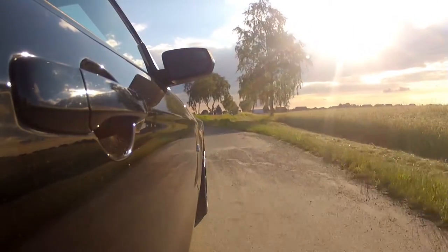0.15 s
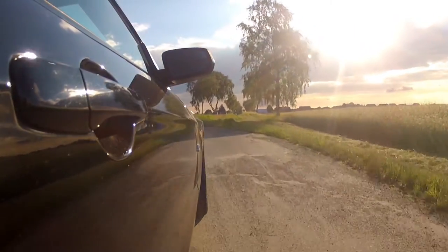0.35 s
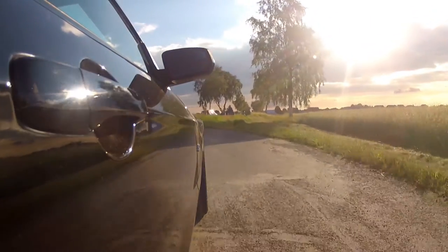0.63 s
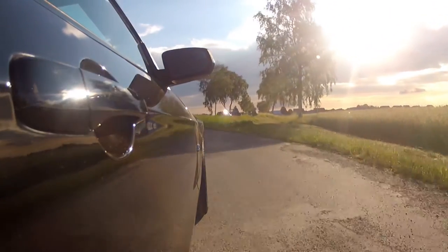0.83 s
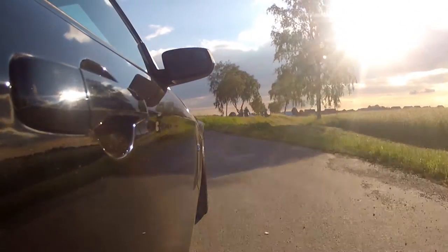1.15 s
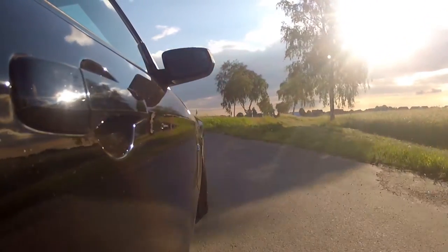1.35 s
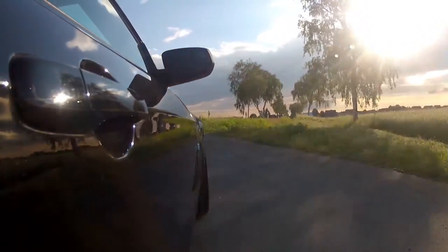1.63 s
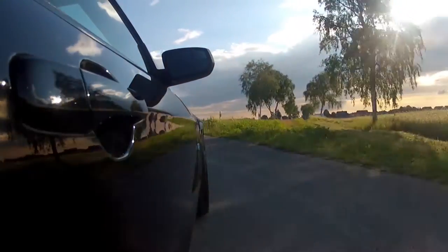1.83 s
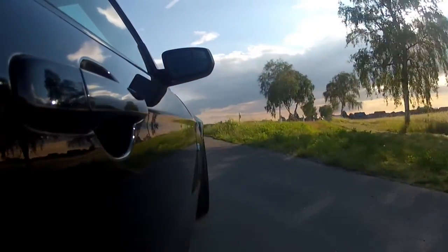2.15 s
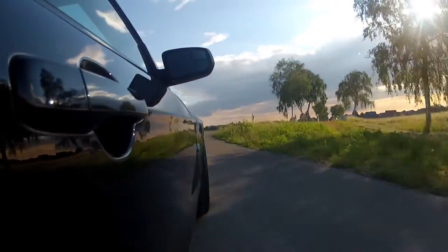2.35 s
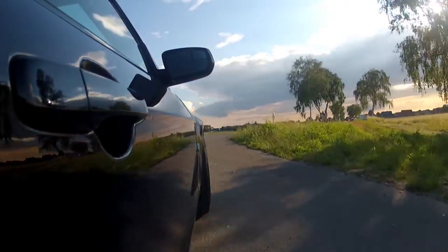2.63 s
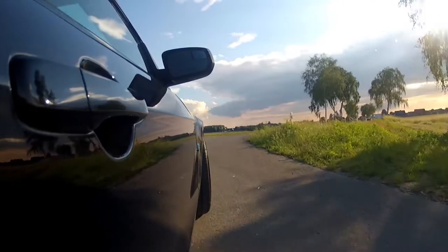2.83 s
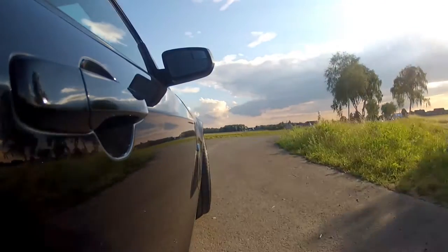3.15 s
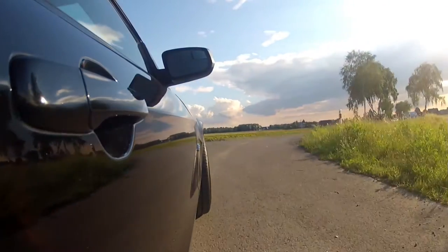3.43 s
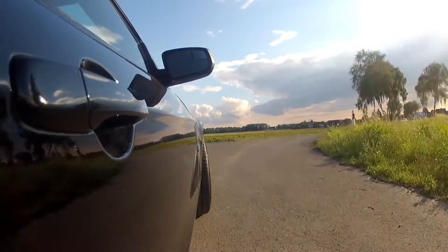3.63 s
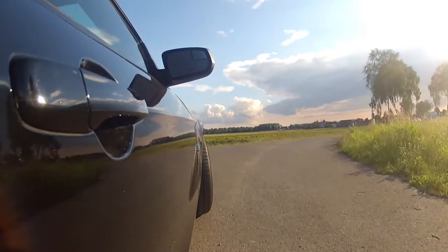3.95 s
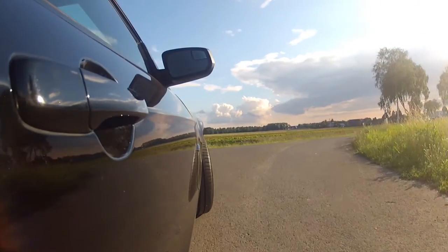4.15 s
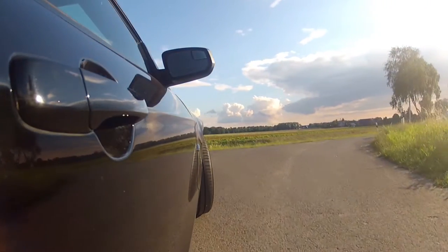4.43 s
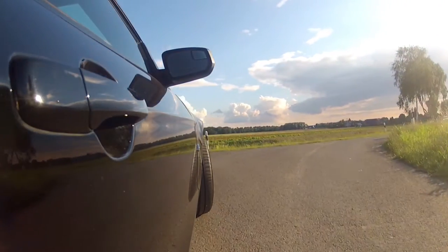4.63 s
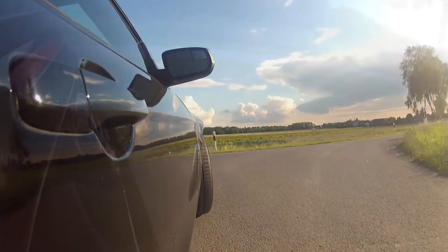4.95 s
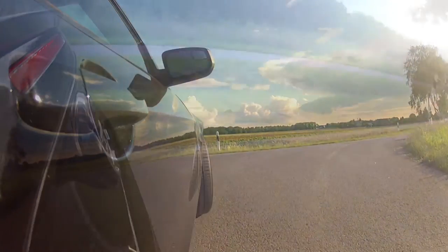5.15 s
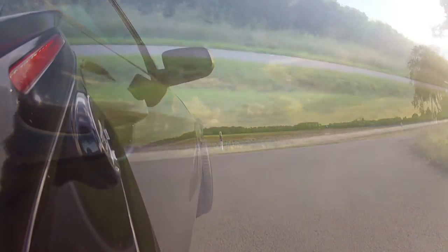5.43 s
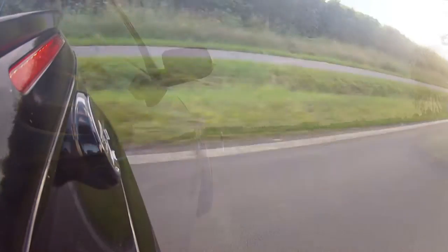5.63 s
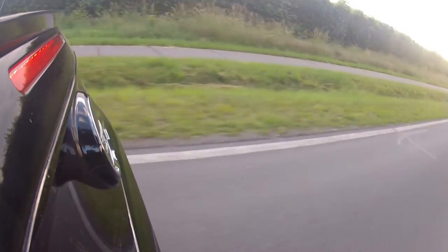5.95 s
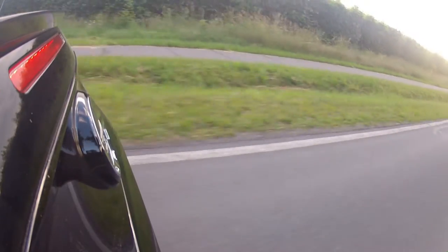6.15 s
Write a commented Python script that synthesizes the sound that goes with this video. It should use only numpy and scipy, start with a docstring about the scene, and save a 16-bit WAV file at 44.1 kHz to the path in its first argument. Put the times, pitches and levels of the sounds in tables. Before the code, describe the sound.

A V8 sports car pulls away on a country lane, heard close from its flank. The loud exhaust throbs at steady revs, then sinks to a loose, quiet burble. The tyres crunch over grit and fling stones against the body, with a few dull thuds from underneath. Near the end the sound changes to the car cruising and shifting up with a low boom, light ticking and wind buffeting the microphone.

```python
"""A country lane, heard from the flank of a V8 sports car as it pulls away. Eight unequal firings excite
the exhaust pipe's resonances, so the sound throbs once per engine cycle; then the revs sink to a burble
while the tyres crunch over grit and fling stones at the body. After five seconds the scene dissolves to
the car cruising and shifting up, with light ticking at the tail and turbulence buffeting the microphone."""
import sys
import numpy as np
from scipy import signal
from scipy.fft import rfft, irfft, next_fast_len
from scipy.io import wavfile
from scipy.ndimage import uniform_filter1d, map_coordinates

SR = 44100
rng = np.random.default_rng(int(sys.argv[2]) if len(sys.argv) > 2 else 0)


def generate_wav(signal):
    """Clip the signal to [-1, 1] and save it as 16-bit WAV at the path in sys.argv[1]."""
    frames = np.transpose(np.atleast_2d(signal))
    scaled = np.clip(frames, -1, 1) * 32767
    pcm = np.round(scaled).astype(np.int16)
    wavfile.write(sys.argv[1], SR, pcm)


N = 277377
T = np.arange(N) / SR


def amp(db):
    """Amplitude ratio of a level in decibels."""
    return 10 ** (np.asarray(db) / 20)


def unit(x):
    """Normalisation to rms 1."""
    return x / np.sqrt(np.mean(x ** 2) + 1e-20)


def steady(x):
    """Normalisation to about rms 1 over a sliding quarter second."""
    power = uniform_filter1d(uniform_filter1d(x ** 2, size=SR // 4), size=SR // 8)
    return x / np.sqrt(np.abs(power) + 1e-3 * np.mean(x ** 2))


def curves(rows):
    """Linear interpolation in time of each column after t/s."""
    s, *columns = np.transpose(rows)
    return [np.interp(T, s, column) for column in columns]


def ramp(start_s, length_s):
    """Linear rise from 0 to 1."""
    return np.clip((T - start_s) / length_s, 0, 1)


def swells(rows):
    """Gaussian rises or dips of level, from rows of t/s, half length/s, level/dB."""
    return sum(db * np.exp(-((T - s) / half_s) ** 2) for s, half_s, db in rows)


def wobble(rate):
    """Smooth random modulation with `rate` knots a second."""
    return map_coordinates(rng.standard_normal(int(N * rate / SR) + 4), [T * rate])


def shape(points, hz):
    """Gain interpolated on a log-frequency axis from points of f/Hz, level/dB."""
    f, db = np.transpose(points)
    return amp(np.interp(np.log(hz + 1), np.log(f), db))


def filtered(x, response):
    """Linear filtering: the spectrum times a complex frequency response."""
    m = next_fast_len(N + SR // 2)
    return irfft(rfft(x, m) * response(np.fft.rfftfreq(m, 1 / SR)), m)[:N]


def noise(points):
    """Gaussian noise of rms 1, coloured by points of f/Hz, relative level/dB."""
    return unit(filtered(rng.standard_normal(N), lambda hz: shape(points, hz)))


def resonance(hz, centre, width):
    """Response of a damped oscillator, with a peak gain of 1."""
    return 1j * hz * width / (centre ** 2 - hz ** 2 + 1j * hz * width)


def coasting(firing_hz, from_hz=76, over_hz=9):
    """Change of regime: 0 for the hard beat under load, 1 for the loose burble at low revs."""
    return np.clip((from_hz - firing_hz) / over_hz, 0, 1)


def firings(firing_hz):
    """Periodic modulation: unequal cylinders repeat their pattern every eight firings, hence the throb."""
    # per cylinder, relative: chuff level/dB, loaded bark level/dB, coasting bark level/dB, manifold delay/s
    cylinders = np.array([(-16.5, 0.5, 4.5, 0.00084), (8, -8, -11.5, 0.00287), (8.5, -14, -5, 0.00044),
                          (12, -14.5, -6.5, 0.003624), (5, -11.5, -1.5, 0.005555), (10, -15, -6.5, .006),
                          (8.5, -19, -5, 0.0019), (8.5, -6.5, -10.5, 0.00026)])
    phase = np.cumsum(firing_hz) / SR - 1.65  # counted in firings
    fired = np.flatnonzero(np.diff(np.floor(phase)) > 0)
    cylinder = np.floor(phase[fired + 1]).astype(int) % len(cylinders)
    chuffs_db, loaded_db, coasting_db, manifold_s = cylinders[cylinder].T
    coast = coasting(firing_hz[fired])
    barks_db = loaded_db + coast * (coasting_db - loaded_db)
    jitter, chuff_scatter, bark_scatter = rng.standard_normal((3, len(fired)), ).reshape(-1, 3).T
    delay_s = manifold_s + (.00015 + .0005 * coast) * jitter
    spread_db = 2.1 + 0.15 * coast
    exits = np.clip(fired + (delay_s * SR).astype(int), 0, N - 1)
    return phase, exits, chuffs_db + spread_db * chuff_scatter, barks_db + spread_db * bark_scatter


def pipe(hz, direct=0.49, lag_s=0.00991, lag_hz=520):
    """Standing waves add to the direct sound; dispersion delays the highs, so each pulse chirps upwards."""
    # exhaust pipe modes: f/Hz, bandwidth/Hz, level/dB
    modes = [(73.8, 65, 2), (160.3, 27.4, -3.5), (193.5, 21, -2.5), (284, 45, 3), (370.7, 109, -1.5),
             (475.8, 27, 1), (495, 13, -19)]
    ring = sum(amp(db) * resonance(hz, centre, width) for centre, width, db in modes)
    group_delay_s = lag_s * np.minimum(hz / lag_hz, 1.15) ** 4
    return (direct + ring) * np.exp(-2j * np.pi * np.cumsum(group_delay_s) * hz[1])


def gas_pulses(exits, sizes_db, spectrum, roughness, puff_s=0.035):
    """Source and filter: slugs of gas, each trailing a puff of turbulence, excite the pipe."""
    pulses = np.bincount(exits, amp(sizes_db), N)
    puff_envelope = signal.lfilter([1], [1, -np.exp(-1 / (puff_s * SR))], pulses)
    flow = unit(pulses) + roughness * unit(puff_envelope * rng.standard_normal(N))
    return steady(filtered(flow, lambda hz: shape(spectrum, hz) * pipe(hz)))


def exhaust(firing_hz, boom_db, chuff_db, bark_db, chuff_rough, bark_rough):
    """Forced vibration: soft chuffs, hard barks, and the silencer's boom at the firing rate and octave."""
    # soft and hard firings behind the silencer: f/Hz, relative level/dB
    chuff_spectrum = [(30, -37.5), (60, -12.5), (110, -1.5), (160, -0.5), (240, 2.5), (330, -16),
                      (500, -24.5), (700, -21), (1200, -70.5), (3000, -100)]
    bark_spectrum = [(25, -30), (50, 1), (72, 0), (130, -15), (220, -11.5), (310, 6.5), (400, 0.5),
                     (520, -3.5), (620, -13.5), (750, -36.5), (1100, -47), (2500, -68), (4000, -100)]
    # low resonances of the silencer: f/Hz, gain/dB
    boom_response = [(42, -19), (49, -21.5), (55, -4), (62, -1), (74, -3), (83, 2), (90, -4), (97, -13),
                     (108, -20), (130, -28), (190, -16.5)]
    phase, exits, chuffs_db, barks_db = firings(firing_hz)
    chuff = amp(chuff_db) * gas_pulses(exits, chuffs_db, chuff_spectrum, chuff_rough)
    bark = amp(bark_db) * gas_pulses(exits, barks_db, bark_spectrum, bark_rough)
    boom = sum(shape(boom_response, k * firing_hz) * np.sin(2 * np.pi * k * phase) for k in (1, 2))
    return chuff + bark + amp(boom_db + 0.45 * wobble(12)) * boom


def pull_away(idle_hz=38.4, sink_s=1.19):
    """Exponential decay: revs are held, then sink towards idle; the exhaust grows with revs and load."""
    # firing rate while the clutch takes up: t/s, f/Hz
    held_revs = [(0, 92), (.3, 96.7), (.6, 96), (.9, 97), (1.2, 94), (1.49, 93.7)]
    # throttle jabs and lifts, heard in the bark: t/s, half length/s, level change/dB
    jabs = [(.655, 0.073, 3), (1.2, 0.11, 1.5), (1.46, 0.1, -5), (1.63, .04, 3.5), (1.9, .08, 4)]
    held_hz, = curves(held_revs)
    lift_s, full_hz = held_revs[-1]
    firing_hz = idle_hz + (held_hz - idle_hz) * np.exp(-np.maximum(T - lift_s, 0) / sink_s)
    revs = (firing_hz - firing_hz.min()) / (full_hz - firing_hz.min())
    load = 1 - ramp(start_s=0.29, length_s=0.71)  # the effort of getting the car rolling
    boom_db = -20 + 5.35 * revs + 16.5 * load
    chuff_db = -32 + 13.3 * revs + 5.74 * load
    bark_db = -37 + 21.28 * revs + 1.44 * load + swells(jabs)
    coast = coasting(firing_hz)
    return exhaust(firing_hz, boom_db, chuff_db, bark_db,
                   chuff_rough=0.5 + 1.2 * coast, bark_rough=0.24 + 0.76 * coast)


def engine_bay():
    """Band-limited noise: a faint, narrow hiss from the engine bay."""
    # hiss: f/Hz, relative level/dB
    hiss_spectrum = [(1200, -25), (1600, 1), (1820, -2.5), (2100, 1), (2800, -21.5), (4000, -26.5)]
    return amp(-58) * noise(hiss_spectrum)


def tyres(grains_per_s=1500):
    """Rolling noise: the tread roars, the road drums through the body and grit cracks under the rubber."""
    # base level of the rolling noise: t/s, level/dB
    rolling = [(0.0, -46.5), (0.68, -44.5), (1.07, -40.5), (1.37, -43), (3.68, -56.5), (4.01, -59),
               (4.97, -56.5), (5.78, -46.5), (6.29, -50)]
    # patches of loose gravel: t/s, half length/s, extra crunch level/dB
    gravel = [(0.267, 0.24, 6), (0.877, .07, 7), (1.16, .12, 8.5)]
    # grit, tread and body: f/Hz, relative level/dB
    crunch_spectrum = [(700, -7.5), (1600, -14), (2200, 6), (2900, 5.5), (3600, -2), (4300, -8),
                       (5500, -15.5)]
    roar_spectrum = [(200, -16.5), (500, 9.5), (750, 0), (1150, -5), (1700, -11), (2600, -12), (3600, -20),
                     (5500, -33)]
    drumming_spectrum = [(12, -17.5), (30, -19.5), (60, 5), (90, -2.5), (160, -11.5), (400, -28),
                         (2000, -91)]
    level_db, = curves(rolling)
    asphalt = ramp(start_s=4.46, length_s=.7)
    crunch_db = level_db + swells(gravel) - 0.5 - 9.5 * asphalt
    grains = (rng.random(N) < grains_per_s / SR) * rng.standard_normal(N)
    grains *= amp(3.3 * np.minimum(rng.exponential(size=N), 4))  # a few crack much louder
    cracking = unit(grains) + 1.03 * rng.standard_normal(N)
    grit = unit(filtered(cracking, lambda hz: shape(crunch_spectrum, hz)))
    roar = amp(level_db + 9 + wobble(26)) * noise(roar_spectrum)
    drumming = amp(level_db + 19.5 + 2.6 * wobble(6.5)) * noise(drumming_spectrum)
    return roar + drumming + amp(crunch_db + 1.9 * wobble(25)) * grit


def knock(s, db, centre_hz, t60, width_hz, snap=3):
    """Impact excitation: an impulse and a decaying noise burst drive one broad resonance."""
    t = np.arange(SR // 5) / SR
    burst = rng.standard_normal(len(t)) * amp(-60 * t / t60) + snap * (t == 0)
    response = resonance(np.fft.rfftfreq(len(t), 1 / SR), centre_hz, width_hz) ** 2
    ring = irfft(rfft(burst) * response, len(t))
    return np.pad(amp(db) * ring / np.abs(ring).max(), (round(s * SR), N))[:N]


def stones(chips_from_s=2.0, chips_for_s=1.4):
    """Brief impacts: flung stones snap against the body, with small chips at random as the car coasts."""
    # the loudest stones: t/s, peak level/dB, f/Hz, T60/s
    strikes = [(.193, -24, 2310, .015), (.893, -22, 2300, 0.025), (1.409, -19.5, 3020, .009),
               (1.51, -27, 2730, 0.036), (1.556, -19, 4640, .008), (1.88, -34, 3760, .085),
               (2.599, -31.5, 2940, .013), (2.68, -30.5, 2940, .012), (3.017, -32.5, 2600, .018),
               (3.148, -35, 2750, 0.036), (3.989, -34, 2710, 0.013), (4.326, -23, 3100, .006)]
    big = sum(knock(s, db, hz, t60, width_hz=0.45 * hz) for s, db, hz, t60 in strikes)
    chips = sum(knock(chips_from_s + when * chips_for_s, db=-39 + 5 * strength,
                      centre_hz=2850, t60=0.015, width_hz=1200)
                for when, strength in rng.random(size=(8, 2)))
    return big + chips


def thuds():
    """Damped low resonances: dull thuds from under the car, and at 3.2 and 3.7 s two hard exhaust firings
    ringing near 280 Hz."""
    # thuds and hard firings: t/s, peak level/dB, f/Hz, T60/s
    blows = [(.548, -5, 74.4, 0.092), (1.968, -9.5, 180, 0.15), (3.175, -18, 280, .18),
             (3.665, -24.5, 282, 0.21), (5.195, -22.5, 560, 0.085), (5.59, -12.5, 112, .05)]
    return sum(knock(s, db, hz, t60, width_hz=.31 * hz) for s, db, hz, t60 in blows)


def wheel_arch(hit_s=3.4255, bounce_s=.003):
    """Modal ringing: one big stone hits the wheel arch and bounces once."""
    # modes of the arch: f/Hz, relative level/dB, T60/s
    modes = [(1150, -3, .022), (1670, -7, .012), (2300, -2.5, 0.021), (3100, -1.5, .04)]
    return sum(knock(s, contact_db + mode_db, hz, t60, width_hz=0.34 * hz, snap=6)
               for s, contact_db in ((hit_s, -23), (hit_s + bounce_s, -28)) for hz, mode_db, t60 in modes)


def scrape(at_s=4.115, half_s=.03):
    """Treble noise under a Gaussian envelope: one faint, high scrape."""
    # scrape: f/Hz, relative level/dB
    spectrum = [(1000, -90), (2500, -43), (3800, 2.5), (4300, -3.5), (5000, -5.0), (5600, -24)]
    stroke = np.exp(-((T - at_s) / half_s) ** 2)
    return amp(-55.5) * stroke * noise(spectrum)


def wind():
    """Turbulent pressure: at speed the air tumbles over the microphone, at times in a heavy gust."""
    # deep buffeting and broader rush: f/Hz, relative level/dB
    buffet_spectrum = [(10, -16), (24, -3), (50, -6), (75, -1.5), (110, -10), (200, -21.5), (800, -100)]
    rush_spectrum = [(40, -9.5), (110, 4.5), (200, -2), (320, -4.5), (450, -10), (620, -13), (900, -44.5),
                     (2000, -35.5), (4000, -90.5)]
    # single gusts: t/s, peak level/dB, f/Hz
    gust_peaks = [(5.145, -14.5, 80), (5.31, -10.5, 89), (5.405, -10.5, 67.5), (5.645, -10.5, 56.29)]
    buffet = amp(-20.5 + 1.2 * wobble(21)) * noise(buffet_spectrum)
    rush = amp(-24.5 + 3.8 * wobble(40)) * noise(rush_spectrum)
    gusts = sum(knock(s, db, hz, t60=0.14, width_hz=0.24 * hz) for s, db, hz in gust_peaks)
    return (buffet + rush) * ramp(start_s=4.81, length_s=0.44) + gusts


def cruise():
    """Resonance at even load: a shift up lowers the firing rate, and the silencer's boom swells."""
    # cruising: t/s, firing rate f/Hz, boom drive level/dB
    upshift = [(5.1, 82, -26), (5.55, 83, -28), (5.72, 70.3, -12), (5.95, 70, -13.5), (6.29, 62, -13)]
    firing_hz, boom_db = curves(upshift)
    return exhaust(firing_hz, boom_db, chuff_db=-27, bark_db=-32, chuff_rough=0.34, bark_rough=0.4)


def ticking(period_s=.0342):
    """Periodic impulses on a high resonance: runs of light ticking at the tail."""
    # runs: start t/s, length/s, mean peak level/dB
    runs = [(5.289, .085, -45.5), (5.43, .02, -47), (5.7734, .04, -36.5), (5.845, .28, -40.5),
            (6.2104, .02, -42)]
    return sum(knock(s, db + 1.2 * rng.standard_normal(), centre_hz=4100, t60=0.023, width_hz=2000)
               for start, length, db in runs for s in np.arange(start, start + length, period_s))


def scene():
    """Superposition in the open air at one close microphone; the pull-away dissolves into the cruise."""
    dissolve = ramp(start_s=5.03, length_s=.15)
    engine = dissolve * cruise() + (1 - dissolve) * (pull_away() + engine_bay())
    return (engine + tyres() + stones() + wheel_arch() + thuds() + ticking() + scrape() + wind())[None]


def record(dry, ceiling=.96, hold_hz=12000, top_hz=15150):
    """Clipping flattens the loudest throbs; sample-and-hold mirrors the spectrum into the treble."""
    # anti-alias filter: f/Hz, gain/dB
    passband = [(4900, 0.0), (5400, 0.5), (5750, -10.0), (6000, -30), (6200, -120)]
    clipped = np.clip(dry[0], -ceiling, ceiling)
    narrow = filtered(clipped, lambda hz: shape(passband, hz))
    mirrored = narrow * (1 + 2 * np.cos(2 * np.pi * hold_hz * T))
    return filtered(mirrored, lambda hz: np.sinc(hz / hold_hz) * (hz < top_hz))[None]


dry = scene()
out = record(dry)
generate_wav(out)
```